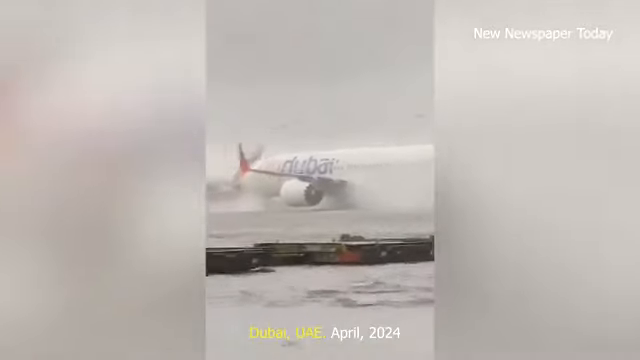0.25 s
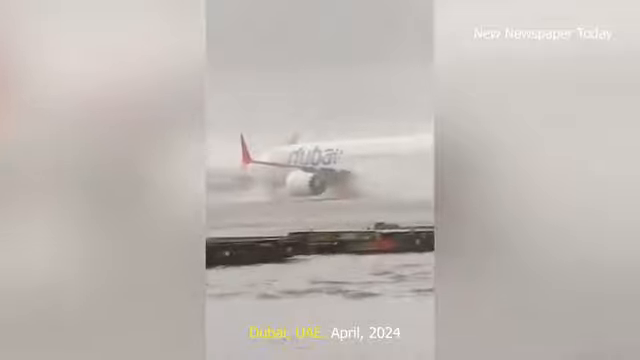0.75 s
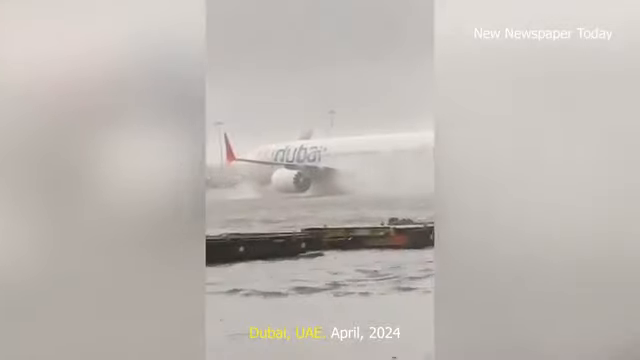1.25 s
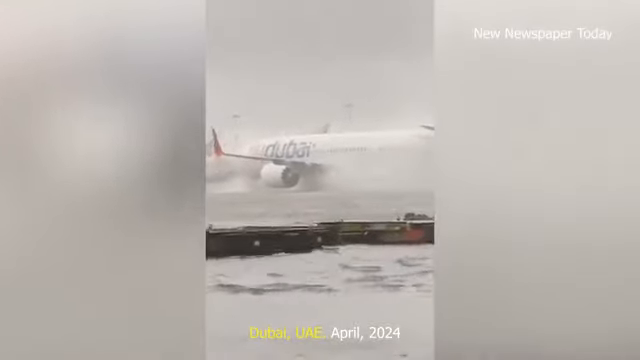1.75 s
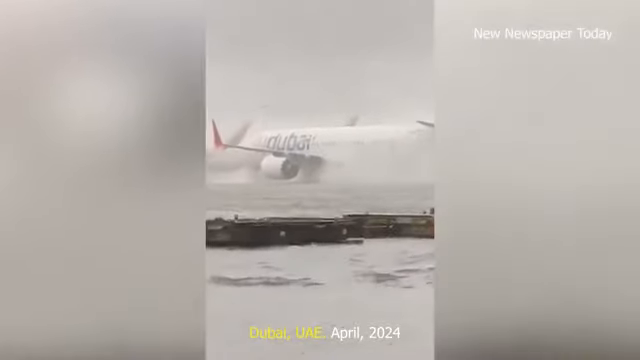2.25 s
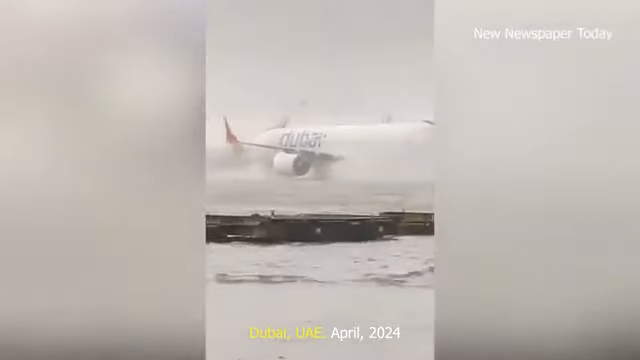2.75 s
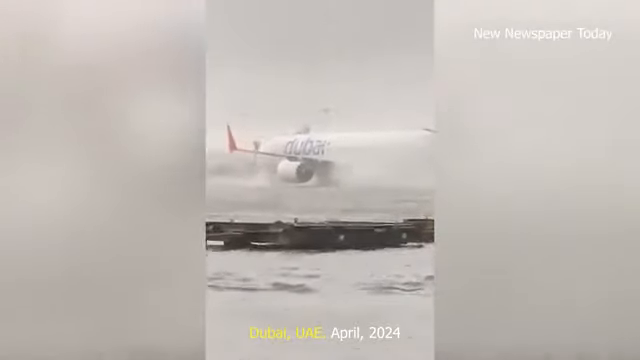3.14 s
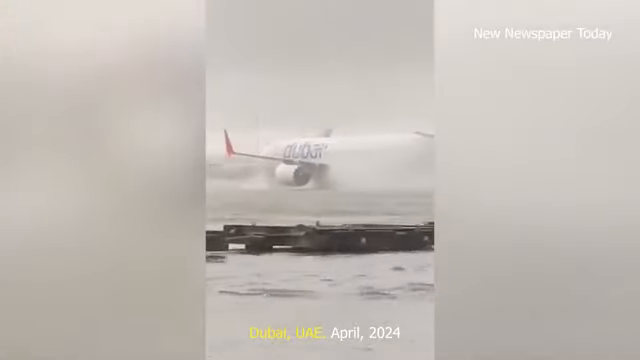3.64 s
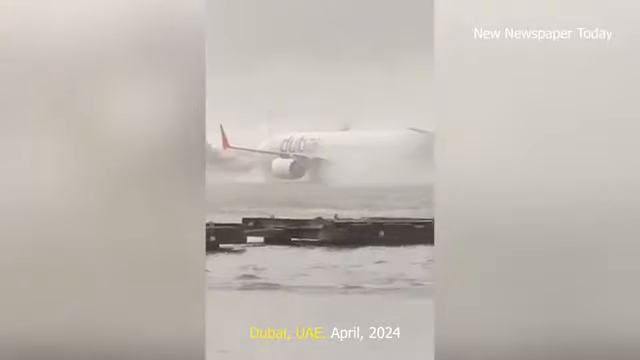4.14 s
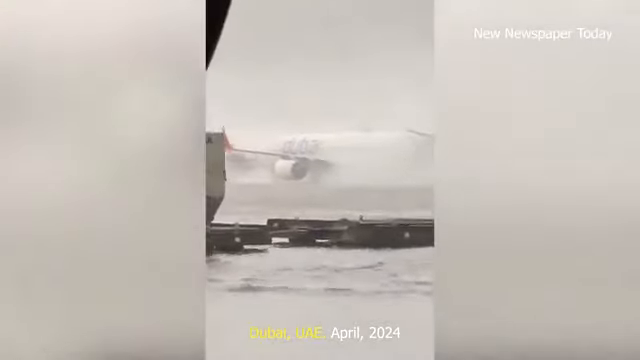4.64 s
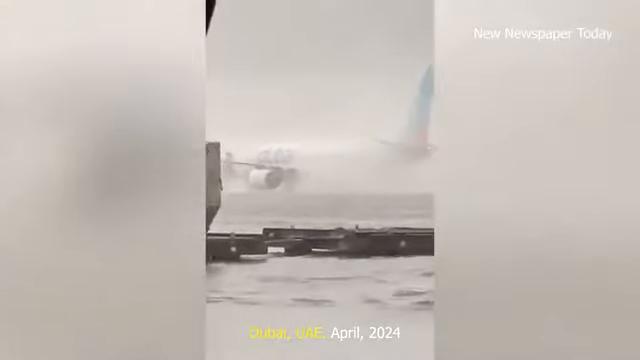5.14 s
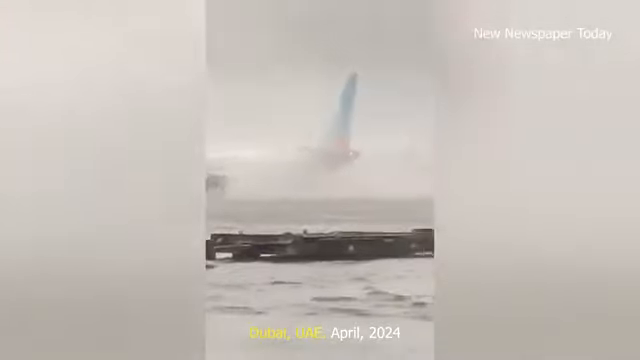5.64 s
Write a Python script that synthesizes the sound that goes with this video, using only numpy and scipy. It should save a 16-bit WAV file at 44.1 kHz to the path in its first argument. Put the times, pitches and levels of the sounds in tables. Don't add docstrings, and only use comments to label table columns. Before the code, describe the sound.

A distant airliner taxis through floodwater on an open apron, heard on a handheld stereo phone in gusty wind. A steady-pitched, high turbine whine fades in and out over a constant hiss of jet roar and spray. Wind blows flick and thump the microphone, clustering before two seconds, easing into a lull, then returning in scattered hits and a heavy late burst.

```python
import sys
import numpy as np
from scipy import signal
from scipy.fft import rfft, irfft, next_fast_len
from scipy.io import wavfile
from scipy.ndimage import uniform_filter1d, map_coordinates

SR = 44100
rng = np.random.default_rng(int(sys.argv[2]) if len(sys.argv) > 2 else 0)


def store_wav(level_fs):
    pcm = np.round(np.clip(np.atleast_2d(level_fs), -1, 1) * 32767)
    wavfile.write(sys.argv[1], SR, pcm.T.astype(np.int16))


def boost(x):
    u = np.asarray(x, float) / 20
    return 10 ** u


N = 260190
T_S = np.arange(N) / SR

# time in seconds, strength in dB, large eddies over middle ones in dB.
WIND_S_DB_DB = [(0, -19.5, -15), (.35, -22.5, -10), (.68, -28, -10.5), (.8, -30.5, 1), (1, -22, -21),
                (1.25, -21, -4), (1.5, -23, 2.5), (1.85, -21.5, -4.5), (2.05, -33, 2), (2.3, -28, -5),
                (2.55, -25, -8.5), (3, -27.5, -6), (3.15, -23, -12.5), (3.9, -23.5, -5.5),
                (4.4, -23.5, -1.5), (4.8, -21.5, -3.5), (5.3, -21, -0.5), (5.9, -22, -1.5)]
# peak time in seconds, peak in dB, half length in seconds,
# large eddies over middle ones in dB.
GUSTS = [(0.104, -16.5, 0.014, -9), (0.294, -20.5, 0.02, -9), (0.403, -18, 0.025, -23),
         (0.646, -21.5, 0.13, -6.5), (1.01, -19.5, 0.033, -9), (1.194, -17.5, 0.034, -4.5),
         (1.3, -23.5, 0.033, -12), (1.395, -18, 0.027, 2.5), (1.653, -20, 0.025, -4),
         (1.781, -19, 0.037, 5.5), (1.898, -24, 0.018, -4), (2.452, -20, 0.035, -29),
         (2.635, -23, 0.041, -6), (2.724, -30, 0.04, 6), (2.84, -29.5, 0.024, 7), (3.146, -27, 0.038, -18),
         (3.326, -17.5, 0.028, -21), (3.563, -18, 0.034, -5), (3.653, -25, .03, -7),
         (3.787, -20.5, 0.066, -4), (3.988, -25, 0.046, 3.5), (4.107, -21.5, 0.079, -4.5),
         (4.378, -19.5, 0.034, 1), (4.53, -18.5, 0.026, 6.5), (4.682, -23, 0.044, 4),
         (4.823, -25.5, 0.043, -5.5), (4.966, -20.5, 0.02, 7), (5.21, -19.5, 0.062, -4),
         (5.37, -22.5, 0.037, 6), (5.427, -18.5, .02, -10), (5.478, -12.5, 0.03, -5),
         (5.607, -35.5, 0.036, 9.5), (5.706, -25.5, 0.056, 6.5), (5.846, -15, 0.026, -8)]
# peak time in seconds, peak in dB,
# half length in seconds.
VEERS = [(0, -34, 0.051), (.5, -34.5, 0.28), (.78, -34.5, 0.034), (1.08, -30.5, 0.067),
         (1.47, -23.5, 0.043), (1.58, -25, 0.037), (1.72, -33, 0.026), (1.89, -24, 0.034),
         (2.5, -30, 0.074), (3.74, -34, 0.036), (4.5, -28, 0.044), (4.61, -26, 0.035), (4.75, -28, 0.084),
         (4.86, -24, 0.02), (5.14, -34, 0.02), (5.58, -25, 0.042), (5.82, -28.5, 0.017)]
# start in seconds, peak in dB, pitch in Hz, length in seconds.
FRONTS = [(0.208, -9, 444, 0.0021), (0.305, -11.5, 337, 0.0041), (0.365, -20, 433, 0.0032),
          (0.534, -20.5, 331, 0.0029), (0.689, -14, 524, 0.0032), (0.976, -9.5, 340, 0.0022),
          (1.008, -15, 540, 0.0033), (1.062, -11.5, 345, 0.0025), (1.189, -23, 334, 0.0022),
          (1.214, -24, 498, 0.0022), (1.317, -22.5, 420, 0.0025), (1.391, -6, 420, 0.0028),
          (1.633, -8, 334, 0.0045), (1.646, -6.5, 334, 0.0033), (1.652, -6, 326, 0.0031),
          (1.664, -16, 404, 0.0039), (1.726, -12, 339, 0.0022), (1.758, -8, 330, 0.0032),
          (1.772, -9.5, 356, 0.0029), (1.788, -13, 335, 0.0025), (1.837, -20, 340, 0.0025),
          (1.956, -12.5, 393, 0.0032), (2.012, -19.5, 422, 0.0027), (2.377, -17, 450, 0.0025),
          (2.696, -14, 330, 0.0025), (2.7, -6.5, 567, 0.0019), (2.727, -19, 416, 0.0025),
          (2.745, -14, 620, 0.0025), (2.774, -14.5, 480, 0.0022), (3.54, -19, 414, 0.0031),
          (3.687, -20, 396, 0.0036), (3.818, -13, 333, 0.0029), (4.012, -13, 388, 0.002),
          (4.064, -16, 635, 0.0027), (4.408, -18, 390, 0.0025), (4.626, -24, 331, 0.0029),
          (4.685, -17, 497, 0.002), (4.934, -16, 396, 0.0025), (5.034, -14.5, 340, 0.0036),
          (5.172, -16, 331, 0.0025), (5.351, -14, 441, 0.0018), (5.387, -14, 350, 0.0025),
          (5.413, -7, 334, 0.0025), (5.425, -9, 331, 0.0035), (5.44, -7, 447, 0.0027),
          (5.451, -13.5, 358, 0.0025), (5.515, -15, 505, 0.0021), (5.685, -19, 331, 0.0025),
          (5.8, -21, 330, 0.0025), (5.843, -26, 331, 0.0023)]
# start in seconds, peak in dB, pitch in Hz, length in seconds.
THUMPS = [(0.072, -10, 191, 0.0038), (0.269, -19, 174, 0.0054), (0.289, -8.5, 175, 0.0047),
          (0.363, -11, 188, 0.007), (0.629, -12, 240, 0.0073), (0.809, -9, 91.5, 0.0048),
          (0.951, -20, 153, 0.005), (1.05, -10.5, 220, 0.005), (1.109, -9, 181, 0.008),
          (1.139, -11, 175, 0.0071), (1.347, -8, 118, 0.005), (1.365, -1.5, 96, 0.005),
          (1.388, -4, 94.2, 0.0064), (1.406, -5, 67.3, 0.0046), (1.603, -6, 122, 0.004),
          (1.648, -9, 61.9, 0.0064), (1.681, -4.5, 131, 0.0057), (1.747, -6.5, 206, 0.0056),
          (1.765, -8, 86.1, 0.005), (1.799, -14, 94.2, 0.005), (1.909, -8, 175, 0.0033),
          (2.471, -12, 210, 0.0085), (2.612, -18, 210, 0.0044), (2.633, -15, 199, 0.0041),
          (2.649, -5.5, 162, 0.005), (2.704, -11, 194, 0.003), (2.801, -14, 78.1, 0.005),
          (3.125, -12, 184, 0.0057), (3.241, -15, 111, 0.005), (3.405, -11, 171, 0.0063),
          (3.522, -7, 119, 0.0039), (3.95, -12, 180, 0.0066), (4.523, -7.5, 61.9, 0.006),
          (4.554, -2, 113, 0.0025), (4.624, -8, 74.5, 0.0044), (4.969, -5.5, 174, 0.005),
          (5.222, -1, 61.9, 0.005), (5.341, -6, 72.7, 0.005), (5.365, -2, 88.8, 0.005),
          (5.384, -3, 240, 0.0069), (5.439, -9, 152, 0.0046), (5.464, -5, 69.6, 0.0061),
          (5.483, -5.5, 178, 0.0073), (5.501, 1, 77.5, 0.0043), (5.531, -13, 119, 0.0044),
          (5.582, -8, 91.5, 0.0054)]
# frequency in Hz, level in dB per Hz.
LARGE_HZ_DB = [(15, -55), (30, -4), (60, 11.5), (120, 13), (170, -8), (300, -62), (2000, -120)]
MIDDLE_HZ_DB = [(70, -24), (130, -2), (180, -0.5), (310, -3), (420, -35), (800, -53.5), (4000, -120)]
SMALL_HZ_DB = [(200, -54.5), (370, 3), (520, -1.5), (850, -8.5), (1100, -27.5), (2000, -29), (6000, -120)]
OPPOSED_HZ_DB = [(20, -32.5), (60, -6.5), (150, -3), (300, 2), (600, -0.5), (1000, -14.5), (1800, -51),
                 (6000, -120)]
# frequency in Hz, level in dB per Hz.
BURST_HZ_DB = [(150, -18), (400, 7.5), (700, -5), (1100, -14), (1600, -24), (3000, -35), (8000, -120)]
# centre in Hz, width in Hz, level in dB.
SHAFTS_HZ_HZ_DB = [(181.3, 11.5, -31.5), (308.5, 7, -37.5), (514.3, 8.6, -39.5)]
# time in seconds, level in dB.
JET_S_DB = [(0, -35.5), (.15, -37), (.8, -37.5), (1.1, -37.5), (2.2, -38), (2.75, -37), (3.1, -37.5),
            (3.75, -37), (4.1, -37.5), (5.5, -38), (5.9, -36.5)]
# frequency in Hz, level in dB per Hz.
ROAR_HZ_DB = [(150, -60), (400, 14), (800, 7.5), (1200, 2.5), (1700, -1), (5200, 0), (6100, -2.5),
              (6600, 0), (7300, -2), (7900, -5.5), (8800, -3.5), (10200, -9), (11300, -13), (11750, -42)]
# centre in Hz, width in Hz, level in dB.
HUMPS_HZ_HZ_DB = [
    (2195, 58, -44),
    (2074, 130, -51.5),
    (2400, 540, -45),
    (4384, 83, -46),
    (4530, 400, -41.5),
    (7470, 150, -60.5),
]
# centre in Hz, width in Hz, level in dB.
FAINT_LINES_HZ_HZ_DB = [
    (4823, 12, -61),
    (6545, 30, -58),
    (7416, 22, -56),
    (8193, 40, -61),
    (8722, 70, -59),
]
# peak time in seconds, peak in dB, half length in seconds.
FAN_SWELLS = [(0, -31, 0.064), (.1, -40, 0.043), (.2, -35, 0.083), (.3, -34.5, 0.036), (.47, -39, 0.04),
              (.66, -43, .03), (.83, -34.5, .035), (1.02, -53, 0.055), (1.3, -49, 0.053), (.9, -38.5, .04),
              (1.46, -43.5, 0.041), (1.53, -39, 0.024), (1.6, -41, .04), (1.92, -37, 0.025),
              (2.17, -40.5, 0.033), (2.27, -38, 0.047), (2.37, -35, 0.03), (2.5, -35, .04),
              (2.58, -33.5, 0.073), (2.74, -39.5, 0.057), (2.97, -37.5, 0.042), (3.14, -33, 0.067),
              (3.26, -37, 0.049), (3.4, -41, 0.049), (3.52, -34.5, 0.064), (3.8, -38.5, 0.031),
              (4, -37, 0.041), (4.09, -34, 0.027), (4.2, -34, 0.071), (4.28, -38, 0.028),
              (4.5, -38.5, 0.16), (4.73, -34.5, 0.022), (4.9, -39.5, 0.052), (5.06, -35, 0.05),
              (5.15, -35, 0.029), (5.27, -55, .04), (5.51, -38, 0.022), (5.58, -37, 0.03),
              (5.79, -41.5, 0.13)]
ROTOR_SWELLS = [(.05, -43, .08), (.36, -45, 0.068), (.52, -42.5, 0.083), (.7, -42, 0.032), (.98, -42, .05),
                (1.25, -43, 0.045), (1.41, -37, 0.045), (1.6, -41, 0.035), (1.94, -39, 0.055),
                (1.82, -47, .05), (2.28, -46.5, .04), (2.45, -46, .05), (2.6, -46, .04), (2.97, -48, .04),
                (3.1, -44, .05), (2.85, -44, .06), (3.48, -41, 0.075), (3.72, -36.5, 0.034),
                (4.12, -43, 0.047), (4.28, -41, 0.027), (4.74, -44, 0.036), (4.86, -39, .03),
                (5.2, -47, .05), (5.5, -39, 0.063), (5.75, -41, 0.089)]
OVERTONE_SWELLS = [(0, -27, 0.013), (.44, -39, 0.029), (.7, -44.5, 0.17), (1.14, -42.5, 0.065),
                   (1.35, -61, .04), (1.7, -41, 0.028), (1.92, -47, .05), (2.15, -49, 0.057),
                   (2.63, -42.5, .06), (3, -43, .04), (3.55, -42, 0.081), (3.84, -37.5, 0.036),
                   (4.18, -37.5, 0.087), (4.4, -41, 0.054), (5.04, -45, 0.035), (5.35, -44, 0.07),
                   (5.65, -52, .06)]
# frequency in Hz, difference over sum in dB.
SPREAD_HZ_DB = [(400, -2), (1100, 3.5), (1400, -3), (1850, -22), (2100, -9.5), (2750, -4.5), (3050, -10.5),
                (4050, -15), (4250, -9), (4780, 7), (4950, 3.5), (5150, 0.5), (5300, -40), (6100, -16),
                (6500, -8.5), (8500, 1), (9500, 5), (11300, 9.5)]

FAN_HZ, ROTOR_HZ = 2181, 2411.5
FAN_DB, ROTOR_DB, OVERTONE_DB = -50.5, -52.5, -50.5
SMALL_DB, SMALL_FOLLOWS = -32, 0.62
OPPOSED_DB, OPPOSED_FOLLOWS = -38.5, .3
WAKE_DB, WAKE_S = -22.5, 0.028
FRONT_DB, RAGGED_DB, THUMP_DB = -4, -9.5, -5


def unit(x):
    return x / np.sqrt(np.mean(x ** 2) + 1e-20)


def along(points, hz):
    f, v = np.transpose(points)
    return np.interp(np.log(hz + 1), np.log(f + 1), v)


def curves(rows):
    s, *cols = np.transpose(rows)
    return [np.interp(T_S, s, c) for c in cols]


def wobble(rate_hz):
    return map_coordinates(rng.standard_normal(N // 50), [T_S * rate_hz])


def filtered(x, response):
    m = next_fast_len(N + SR // 4)
    return irfft(rfft(x, m) * response(np.fft.rfftfreq(m, 1 / SR)), m)[..., :N]


def swells(rows, floor_db):
    s, db, half_s = np.transpose(rows)[:, :, None]
    coarse_s = T_S[::64]
    bell_power = boost(2 * db) * np.exp(-((coarse_s - s) / np.maximum(half_s, .01)) ** 2)
    return 10 * np.log10(boost(2 * floor_db) + np.interp(T_S, coarse_s, bell_power.sum(axis=0)))


def rush(spectrum, patchy_db):
    z = signal.stft(rng.standard_normal(N + 512), nperseg=512)[2]
    field = uniform_filter1d(rng.standard_normal(z.shape), size=5, axis=0)
    field = uniform_filter1d(field, size=10, axis=1)
    noise = signal.istft(z * boost(patchy_db * unit(field)), nperseg=512)[1][:N]
    return unit(filtered(noise, lambda hz: boost(along(spectrum, hz))))


def bells(rows):
    def response(hz):
        power = 0
        for centre, width, db in rows:
            bell = np.exp(-2 * ((hz - centre) / width) ** 2)
            power = power + boost(2 * db) * bell * SR / (width * np.sqrt(2 * np.pi))
        return np.sqrt(power)
    return filtered(rng.standard_normal(N), response)


def eddies(spectrum, lumps_db, hold_s):
    x = rush(spectrum, patchy_db=0.37)
    x = x / np.sqrt(np.abs(uniform_filter1d(x ** 2, int(hold_s * SR))) + 0.058)
    return unit(boost(lumps_db) * x)


def swings(rows, sharp):
    out, env = np.zeros(N + SR), np.zeros(N + SR)
    t = np.arange(SR // 14) / SR
    for (s, db, hz, life_s), (turn, sag) in zip(rows, rng.random((len(rows), 2))):
        i = round(s * SR)
        u = t / max(life_s, .0015)
        phase = 2 * np.pi * (hz * t * (1 - 4 * sag * t) + .3 * turn)
        shape = boost(db) * u * np.exp(1 - u)
        out[i:i + len(t)] += shape * np.sin(phase + sharp * np.sin(phase))
        env[i:i + len(t)] += shape
    return out[:N], env[:N]


def wind():
    strength_db, large_db = curves(WIND_S_DB_DB)
    middle_db = swells([row[:3] for row in GUSTS], strength_db)
    deep = [(s, db + deep_db, half_s) for s, db, half_s, deep_db in GUSTS]
    slow_db = swells(deep, strength_db + large_db)
    wakes = [(s + WAKE_S / 2, db + WAKE_DB, WAKE_S) for s, db, *_ in FRONTS]
    small_db = swells(wakes, SMALL_DB + SMALL_FOLLOWS * (middle_db - middle_db.mean()))
    apart_db = swells(VEERS, OPPOSED_DB + OPPOSED_FOLLOWS * (strength_db - strength_db.mean()))
    lump = wobble(28)
    both = boost(slow_db - 2.0) * eddies(LARGE_HZ_DB, 0.4 * lump, hold_s=0.044)
    both += boost(middle_db - 2.5) * eddies(MIDDLE_HZ_DB, 2.0 * lump, hold_s=0.075)
    both += boost(small_db) * eddies(SMALL_HZ_DB, 2.6 * lump + 2.1 * wobble(60), hold_s=0.052)
    apart = boost(apart_db) * eddies(OPPOSED_HZ_DB, 1.2 * wobble(20), hold_s=0.11)
    return both * boost([[.2], [-.2]]) + apart * np.array([[1], [-1]])


def gust_fronts():
    burst = eddies(BURST_HZ_DB, 0, hold_s=0.0044)
    front, env = swings(FRONTS, sharp=0.37)
    return boost(FRONT_DB) * (front + boost(RAGGED_DB) * env * burst)


def thumps():
    return boost(THUMP_DB) * swings(THUMPS, sharp=0.3)[0]


def drone():
    return boost(3 * wobble(4)) * bells(SHAFTS_HZ_HZ_DB)


def roar():
    jet = boost(10 + 0.42 * wobble(9.8)) * rush(ROAR_HZ_DB, patchy_db=1.7)
    smeared = boost(40.5) * bells(HUMPS_HZ_HZ_DB) + boost(45.5) * bells(FAINT_LINES_HZ_HZ_DB)
    return boost(curves(JET_S_DB)[0]) * (jet + smeared)


def tone(hz, drift_rad, flutter_db):
    size = np.sqrt(2) * boost(flutter_db * wobble(22.13))
    return size * np.sin(2 * np.pi * hz * T_S + drift_rad * wobble(9.7))


def whine():
    fan_db = swells(FAN_SWELLS, FAN_DB) + 3.5
    rotor_db = swells(ROTOR_SWELLS, ROTOR_DB) + 1.5
    overtone_db = swells(OVERTONE_SWELLS, OVERTONE_DB) + 3.5
    fan = boost(fan_db) * tone(FAN_HZ, drift_rad=.9, flutter_db=.4)
    rotor = boost(rotor_db) * tone(ROTOR_HZ, drift_rad=.8, flutter_db=1.2)
    overtone = boost(overtone_db) * tone(2 * FAN_HZ, drift_rad=1.9, flutter_db=1.8)
    return fan + rotor + overtone


def ports(direct, scattered, lead, lean):
    def turn(hz):
        return np.arctan(boost(along(SPREAD_HZ_DB, hz)))

    def nearer(hz):
        return 1j * lead + lean / (1 + (hz / 1500) ** 4)

    lead = np.clip(lead, 0, 1)
    mid = filtered(direct, lambda hz: np.cos(turn(hz)))
    early = filtered(direct, lambda hz: nearer(hz) * np.sin(turn(hz)))
    scatter = filtered(scattered, lambda hz: np.sin(turn(hz)))
    side = early + np.sqrt(1 - lead ** 2) * scatter
    return np.array([mid + side, mid - side])


def airliner():
    return ports(roar() + whine(), roar() + whine(), lead=.45, lean=.15)


def scene():
    return wind() + gust_fronts() + thumps() + drone() + airliner()


def roll_off(x):
    return signal.sosfilt(signal.butter(12, 11600, fs=SR, output="sos"), x)


def record(dry):
    soft = dry / (1 + np.abs(dry / .95) ** 5) ** (1 / 5)
    return roll_off(soft)


dry = scene()
out = record(dry)
store_wav(out)
```